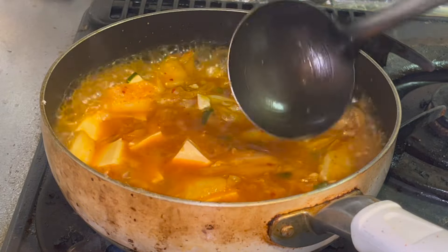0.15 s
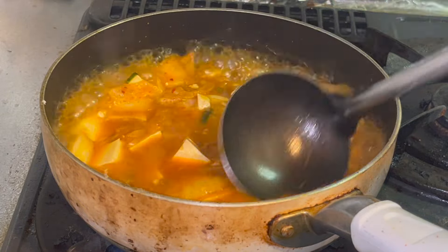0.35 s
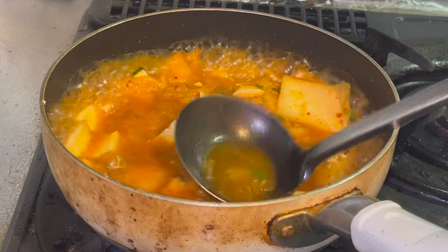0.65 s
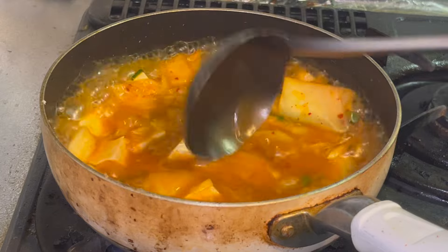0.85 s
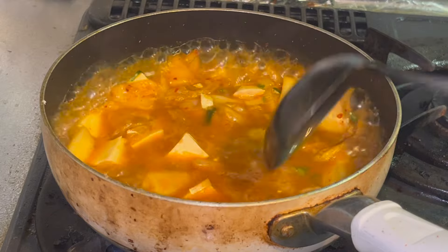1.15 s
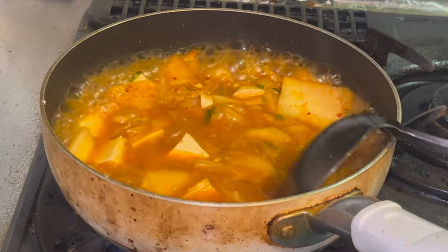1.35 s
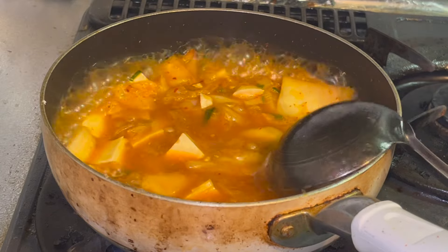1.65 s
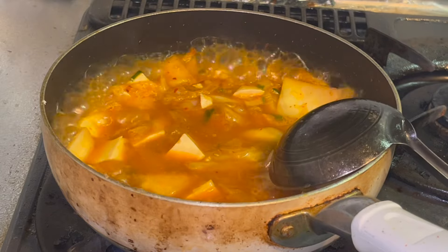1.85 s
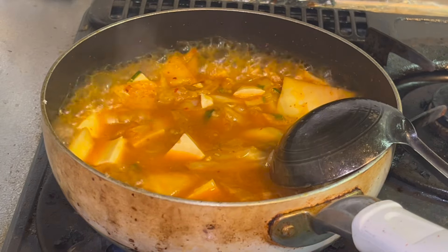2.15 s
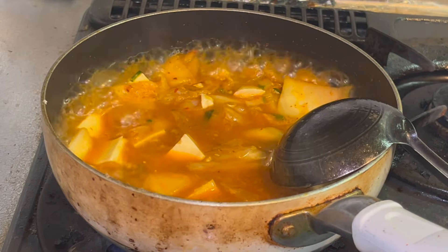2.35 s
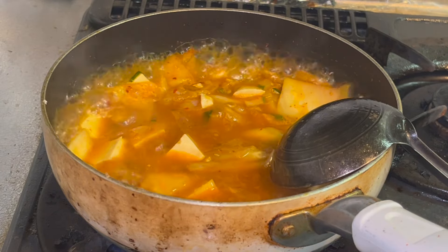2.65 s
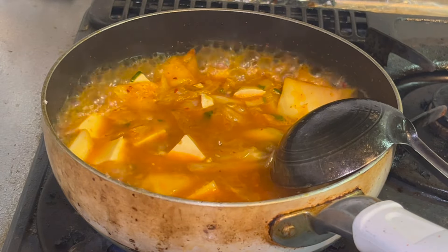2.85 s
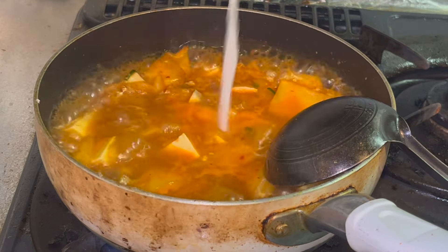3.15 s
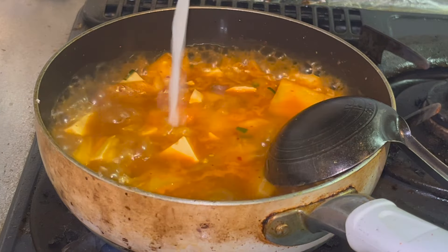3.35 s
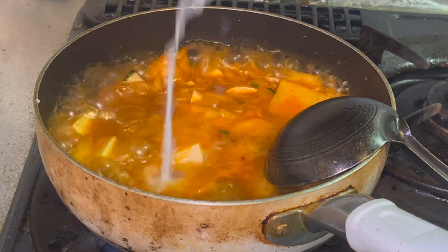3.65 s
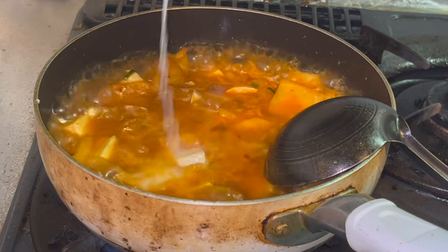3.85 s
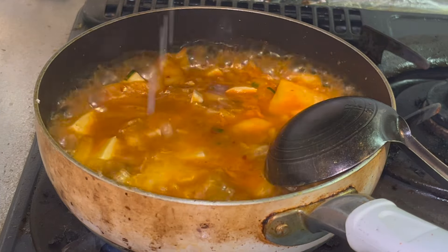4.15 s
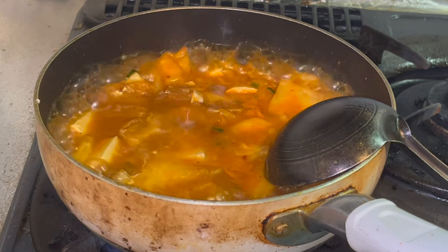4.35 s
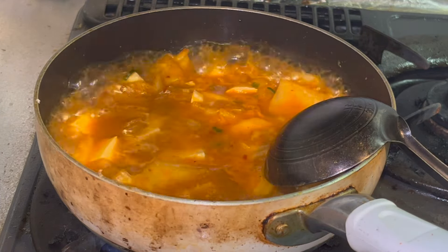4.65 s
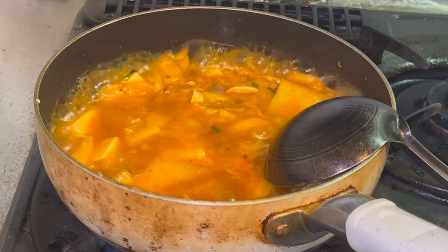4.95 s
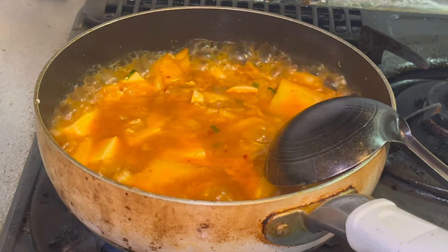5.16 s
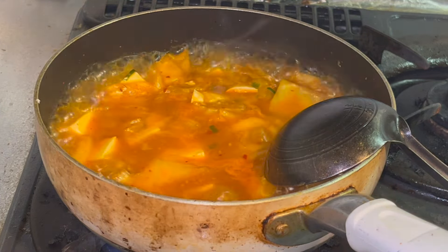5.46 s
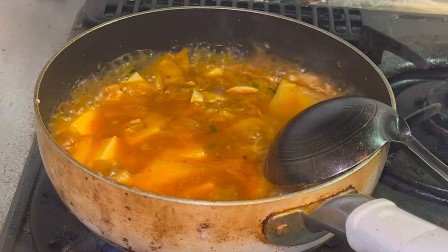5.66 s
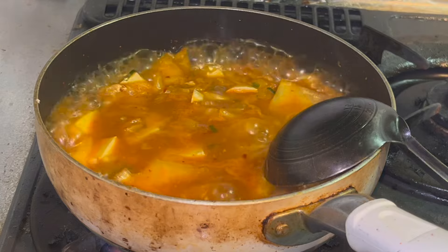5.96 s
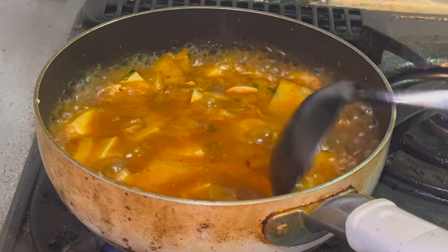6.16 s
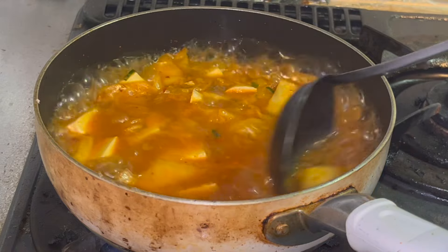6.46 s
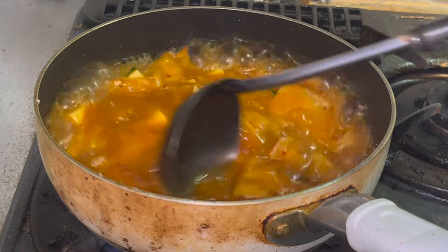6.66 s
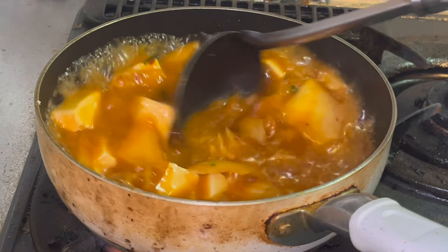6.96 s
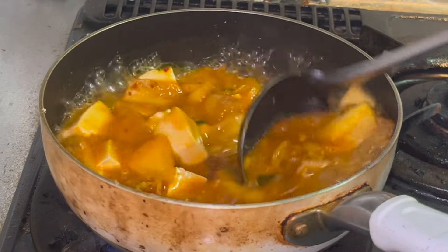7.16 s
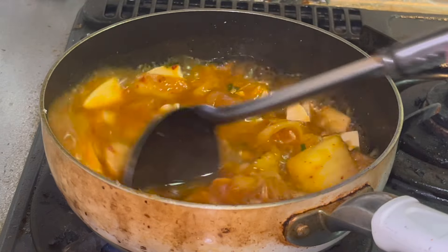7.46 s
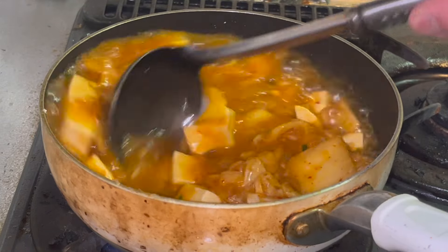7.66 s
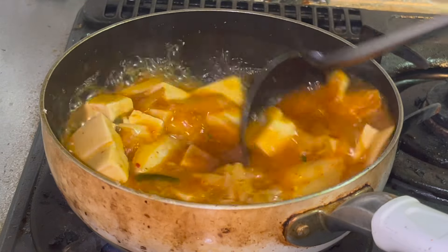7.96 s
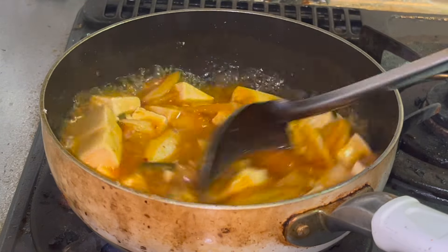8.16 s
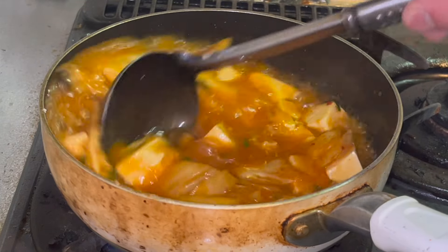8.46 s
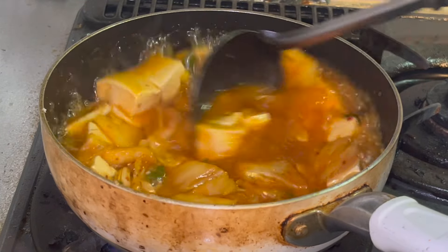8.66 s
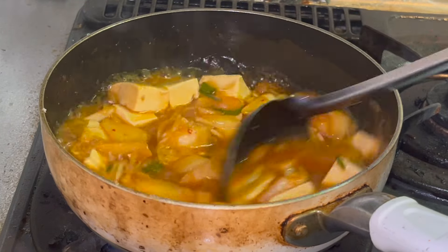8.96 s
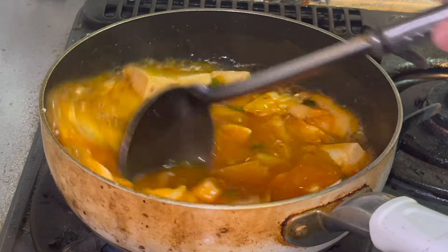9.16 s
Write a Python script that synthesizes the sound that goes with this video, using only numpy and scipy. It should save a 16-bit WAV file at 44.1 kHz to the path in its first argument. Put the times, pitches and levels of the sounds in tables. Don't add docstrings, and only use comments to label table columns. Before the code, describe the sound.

In a small home kitchen, broth simmers close to a handheld stereo microphone, with plopping bubbles over low flame rumble, hood hum and faint gas hiss. Early on a ladle drops onto the pan rim with a loud metallic clack and quick rattle. A thin stream patters in, a spoon clinks in a bowl that thuds onto the counter, and then the ladle gently stirs with light ticks.

```python
import sys
import numpy as np
from scipy import signal
from scipy.fft import rfft, irfft, next_fast_len
from scipy.io import wavfile

SR = 44100
rng = np.random.default_rng(int(sys.argv[2]) if len(sys.argv) > 2 else 0)


def amplitude_ratio(level_db):
    exponent = np.asarray(level_db, float) / 20
    return 10 ** exponent


def log_audio(samples):
    frames = np.atleast_2d(samples).T
    limited = np.clip(frames, -1, 1)
    pcm = np.round(limited * 32767).astype(np.int16)
    wavfile.write(sys.argv[1], SR, pcm)


N = 411012
PAD = next_fast_len(N + SR)
HZ = np.arange(PAD // 2 + 1) * SR / PAD

# (time [s], bubbling level [dB])
VIGOUR = [(0.0, -51.5), (0.6, -51), (1.66, -49.5), (2.2, -50.5), (3.0, -49), (3.75, -47), (4.2, -50),
          (5.3, -48), (5.65, -45.5), (6.36, -49.5), (6.6, -51), (7.3, -51), (7.74, -51), (8.05, -54),
          (9.32, -57.5)]
# (time [s], peak level [dB], pitch [Hz])
GLUGS = [(0.31, -28, 1720), (1.378, -29, 1390), (1.997, -31, 750), (2.126, -41, 696), (2.351, -27, 1820),
         (2.924, -31, 2040), (2.968, -29, 1750), (3.212, -29.5, 1770), (3.419, -29.5, 1060),
         (3.682, -33, 736), (3.347, -32.5, 555), (3.713, -38, 851), (3.827, -27.5, 1700),
         (3.921, -27, 1070), (4.145, -32, 820), (4.521, -25, 1700), (4.785, -31, 844), (4.815, -31, 1690),
         (5.21, -30, 1710), (5.227, -24, 1900), (5.261, -25, 1890), (5.805, -39, 525), (5.958, -31, 780),
         (6.17, -30, 886), (6.418, -39, 1900), (6.612, -27, 1500), (6.006, -32, 720), (6.353, -31, 1150),
         (6.463, -33, 800), (6.648, -26, 1630), (6.743, -35, 1110), (6.814, -30, 1150),
         (7.232, -26.5, 2650), (7.243, -32.5, 520), (7.275, -31, 2630), (7.407, -30, 1810),
         (7.503, -30, 530), (7.902, -28, 1780), (7.915, -30, 1750), (8.012, -29.5, 440),
         (8.329, -27.5, 1680), (8.697, -24.5, 1890), (9.224, -32, 1690)]
# (frequency [Hz], density [dB per Hz])
GURGLE = [(500, -40), (700, -6), (1000, -4.5), (1400, -3), (1900, -2.5)]
BROTH = [(240, -15.5), (300, -1), (600, -4.5), (1000, -10), (1600, -4.5), (1700, -6.5), (2100, -5.5),
         (3000, -10.5), (3500, -15.5), (5500, -18), (7000, -18)]
# (frequency [Hz], width [Hz], height over noise [dB])
PAN_HUM = [(438, 75, 10.54), (1195, 21, 3.9), (1720, 33, 10.4), (1890, 54, 7.3)]
# (time [s], peak level [dB], pitch [Hz])
DROPS = [(0.5896, -29.5, 3280), (0.6609, -39, 4790), (1.0021, -44, 3080), (1.3758, -39, 3760),
         (2.7185, -30, 3000), (3.037, -37, 3520), (3.266, -30, 7500), (3.3218, -37, 4000),
         (3.3386, -24.5, 6350), (3.3608, -36, 3560), (3.295, -40, 4000), (3.4807, -42, 3580),
         (3.5156, -36, 3900), (3.5294, -28.5, 4800), (3.7815, -46, 3870), (3.805, -42, 4210),
         (3.5444, -39, 5040), (3.682, -35, 4800), (4.5313, -38, 3000), (4.816, -36.5, 3400),
         (5.9599, -36, 3400), (6.1587, -38, 4450), (6.19, -29, 2750), (6.8467, -31, 4700),
         (6.9092, -42, 5170), (7.2818, -37, 3580), (7.4071, -35, 3420), (7.9149, -64, 3050)]
SPRAY = [(3.038, -37.5, 6800), (3.15, -39, 8000), (3.185, -42, 7400), (3.267, -35, 3830), (3.49, -38, 9050),
         (3.665, -34, 8040), (3.752, -39, 14300), (3.81, -37, 14000), (4.129, -35, 7700)]
# (time [s], peak level [dB], brightness [dB], crack level [dB], contact [s])
KNOCKS = [
    (1.6312, -3, 8.5, -11.5, 0.00076),
    (1.6345, -15, 9, -8, 0.001),
    (1.647, -12.5, 4, -22, 0.002),
    (1.663, -19, -6, -2, 0.0043),
    (1.681, -24, 0, -14, 0.004),
    (1.695, -21, 16, 4.5, 0.003),
]
# (frequency [Hz], level [dB], 60 dB decay [s])
PAN = [(248, -4, 0.08), (300, -7, 0.038), (396.6, -1.5, 0.12), (434, -6.5, 0.16), (492, -7, 0.09),
       (678, -10, 0.071), (750, -3, 0.03), (930, -0.5, 0.021), (1045, -4, 0.027), (1240, -7, 0.028),
       (1390, -5, 0.021), (1720, -2, 0.016), (1910, -5, 0.02), (2600, -19, .05), (2970, -28, 0.059),
       (3480, -25, 0.025), (3920, -39, 0.059), (4800, -35, 0.045), (5860, -16, 0.012)]
# (time [s], peak level [dB], brightness [dB], crack level [dB], contact [s])
TICKS = [(1.461, -30, 8, -7, 0.006), (4.786, -46, -3, -25, .001), (6.354, -38, -3, -30, .001),
         (6.569, -32.5, 7, -9, 0.003), (6.575, -36, 3, -11, .003), (6.59, -49, -8, -16, 0.024),
         (7.205, -49, 6, 11.5, .002), (9.063, -58, -6, 16, .003), (7.233, -54, 1, -10, .001),
         (9.162, -33.5, -1, -22, 0.0027)]
# (frequency [Hz], level [dB], 60 dB decay [s])
LADLE = [(500, -1, 0.025), (820, 2.5, 0.02), (1150, -1, 0.018), (1370, -1, 0.021), (1950, -12, 0.039),
         (2500, -16, 0.015), (3400, -37, 0.016), (3900, -28, .03), (4700, -11, 0.019), (5530, -9, 0.018)]
# (time [s], peak level [dB], brightness [dB], crack level [dB], free ringing [s])
CLINKS = [(5.112, -34.5, 35, -14, .016), (5.119, -37, 32, 3, .012), (5.137, -40.5, 25, 6, .02),
          (5.141, -34, 5, -12, .016), (5.319, -18.5, -10, -22, 0.021), (5.331, -31.5, 25, -5, 0.018),
          (5.36, -22, -12, -12, 0.015), (5.371, -16, 11, -17, 0.01), (5.384, -30, 24, -4, .01),
          (5.4, -31, 8, -13, 0.006), (5.415, -42, 34, -12, .04), (5.509, -18, -2, -15.5, 0.013),
          (5.518, -27, -5, -20, 0.011), (5.531, -31, 4, -22, .04)]
# (frequency [Hz], level [dB], 60 dB decay [s])
BOWL = [(2454, -5.5, .08), (2555, 0.5, 0.13), (2596, -2.5, 0.048), (3050, -13, 0.033), (3240, -22, 0.03),
        (5580, -7, 0.023), (5660, -13.5, 0.082), (5850, -6.5, 0.03), (6650, -16, 0.049), (7830, -23, 0.086),
        (9300, -20, 0.055), (10020, -15.5, 0.11), (11500, -27, .04), (14600, -20, .04)]
# (time [s], peak level [dB], brightness [dB], crack level [dB], contact [s])
THUDS = [
    (5.4885, -13.5, 8, -18, 0.001),
    (5.497, -31.5, 14, -20, .002),
    (5.5135, -16.5, -4, -12, 0.0033),
]
# (frequency [Hz], level [dB], 60 dB decay [s])
COUNTER = [(198, -20, 0.15), (332, -14.5, 0.066), (422, -7.5, 0.045), (563, -2, 0.058), (650, -6, 0.124),
           (708, 1.5, 0.085), (825, -2.5, 0.048), (967, 0, 0.038), (1295, 5.5, 0.015), (1690, -3, 0.019),
           (2040, 0.5, 0.01), (2430, 1.5, 0.015)]
# (time of firmest press [s], level [dB], swell [s], fade [s])
STROKES = [
    (6.61, -44, .025, 0.12),
    (7.85, -63, 0.16, 0.078),
    (8.9, -51.5, 0.41, 0.063),
]
# (frequency [Hz], density [dB per Hz])
RUB = [(380, -6), (440, 1.5), (520, -4), (950, -51), (1110, 1), (1250, -15), (1500, -11)]
# (time [s], peak level [dB], pitch [Hz])
SURGES = [(1.669, -40, 70.0), (1.992, -31.5, 70.6), (2.05, -34, 60.4), (2.598, -35, 51),
          (2.652, -31.5, 68.5), (4.298, -32.5, 89), (4.459, -37, 87.5), (4.549, -38, 95), (5.527, -30, 90)]
# (frequency [Hz], density [dB per Hz])
RUMBLE = [(30, -30), (46, -1), (150, -8.5), (165, -6), (260, -6), (290, -17), (400, -14)]
HISS = [(4500, -3.5), (6000, -12.5), (7200, -5), (8400, -10), (9500, -2.5), (10500, -3.5), (11500, -1),
        (13000, -4.5), (14500, -3), (15600, -31), (15950, -24)]
# (frequency [Hz], width [Hz], height over noise [dB])
HOOD = [(53, 16, 3), (79.3, 5.7, 7), (98, 13, 6.5), (119.9, 5.7, 11.5), (141, 4.8, 11.5)]
JET = [(11920, 190, 10.8), (10350, 96, 4.4), (14000, 100, 3)]
# (frequency [Hz], 60 dB decay [s])
KITCHEN = [(150, 0.41), (600, 0.23), (2500, 0.15), (8000, 0.1)]
# (frequency [Hz], likeness [0-1])
LIKENESS = [(100, .99), (260, .92), (500, .72), (900, .62), (1250, .35), (1550, .55), (1900, .8),
            (2400, .97), (2900, .99), (3500, 1), (4600, 1), (6000, .94), (8500, .92), (10800, 1),
            (11800, 1), (14000, .92)]
# (frequency [Hz], right leads left [turns], left minus right [dB])
PORTS = [(0, 0, 0), (490, -0.0072, -2.5), (1070, -0.15, 0.5), (1394, -0.28, -1), (1416, -0.19, -6),
         (1737, -0.92, -5), (2390, -1.04, -1.5), (3000, -1.032, 1), (3660, -1.011, 1)]
# (frequency [Hz], lead [turns])
SWING = [(5300, 0), (5700, .16), (7000, .25), (7700, .39), (8200, .485), (8800, .51), (9400, .66),
         (10600, .81), (11200, 1), (12800, 1), (13500, 1.15), (14500, 1.44), (14900, 1.5), (17000, 1.5)]


def at_hz(points):
    hz, value = np.transpose(points)
    return np.interp(np.log(HZ + 1), np.log(hz), value)


def drift(rate):
    r = np.exp(-80 * np.pi * rate / SR)
    wander = signal.lfilter([1], [1, -2 * r, r * r], rng.standard_normal(N // 40 + 2002))
    slow = wander[2000:]
    return np.interp(np.arange(N) / 40, np.arange(len(slow)), slow / slow.std())


def add(track, s, sound):
    i = round(s * SR)
    track[i:i + len(sound)] += sound[:N - i]


def steady_noise(spectrum, peaks, shared_db, own_db, shared_rate):
    low_hz, high_hz = spectrum[0][0], spectrum[-1][0]
    gain = amplitude_ratio(at_hz(spectrum)) * (HZ > low_hz) * (HZ < high_hz)
    for hz, width, db in peaks:
        gain = gain * (1 + (amplitude_ratio(db) - 1) / (1 + (2 * (HZ - hz) / width) ** 2))
    alike = np.clip(at_hz(LIKENESS), 0, 1)
    mid, side = rfft(rng.standard_normal((2, PAD)))
    pair = gain * (np.sqrt(1 + alike) * mid + np.sqrt(1 - alike) * side * [[1], [-1]])
    octave = np.log2(HZ / low_hz + 1e-9)
    together = shared_db * drift(shared_rate)
    out = 0
    for k in np.arange(0, np.log2(high_hz / low_hz) + 1):
        band = np.cos(np.pi / 2 * np.clip(octave - k, -1, 1)) ** 2
        flicker = amplitude_ratio(together + own_db * drift(17.0))
        out = out + flicker * irfft(pair * band, PAD)[:, :N]
    return out / out.std()


def bubble(hz, cycles, rise):
    turns = np.arange(int(cycles * SR / hz)) * hz / SR
    swell = 1 - np.exp(-turns / 1.54)
    return swell * amplitude_ratio(-40 * turns / cycles) * np.sin(2 * np.pi * turns * (1 + rise * turns / cycles))


def boil(per_s, low_hz, octaves, cycles):
    chance = rng.random(N)
    look = rng.random((N // 20, 2))
    born = np.flatnonzero(chance < per_s * amplitude_ratio(5.0 * drift(6.0)) / SR)
    out = np.zeros(N)
    for i, (pitch, size) in zip(born, look):
        loudness = amplitude_ratio(-3.3 * np.log(size + 0.02))
        add(out, i / SR, loudness * bubble(low_hz * 2 ** (octaves * pitch), cycles, rise=0.091))
    return out


def pops(events, cycles, rise, lift_db):
    out = np.zeros(N)
    for s, db, hz in events:
        add(out, s, amplitude_ratio(db + lift_db) * bubble(hz, cycles, rise))
    return out


def splashes(events, long_s, spread, lift_db):
    out, t = np.zeros(N), np.arange(SR // 20) / SR
    envelope = amplitude_ratio(-60 * t / long_s) * (1 - np.exp(-t / 0.002))
    for (s, db, hz), noise in zip(events, rng.standard_normal((len(events), len(t)))):
        edges = signal.butter(2, [hz / spread, hz * spread], "band", fs=SR, output="sos")
        add(out, s, amplitude_ratio(db + lift_db) * signal.sosfilt(edges, noise * envelope))
    return out


def bubbling_broth(boil_db):
    out = amplitude_ratio(boil_db + 5.5) * boil(per_s=45.0, low_hz=408.0, octaves=2.574, cycles=12.8)
    out += amplitude_ratio(boil_db + 20.0) * boil(per_s=250.0, low_hz=506, octaves=2.975, cycles=2.81)
    gurgle = steady_noise(GURGLE, [], shared_db=3.0, own_db=4.0, shared_rate=21.0)[0]
    out += amplitude_ratio(boil_db - 5.0) * gurgle
    out += pops(GLUGS, cycles=10.1, rise=0.019, lift_db=4.5)
    return out + splashes(GLUGS, long_s=0.038, spread=1.38, lift_db=-1.5)


def simmer(t, boil_db):
    warming_db = 0.2448 * (t - t.mean())
    level_db = -45.5 + warming_db + 0.1 * (boil_db - boil_db.mean())
    return amplitude_ratio(level_db) * steady_noise(BROTH, PAN_HUM, shared_db=1.0, own_db=.9, shared_rate=8.0)


def spatter():
    ringing = pops(DROPS, cycles=21.0, rise=0.022, lift_db=-8.0)
    return ringing + splashes(DROPS + SPRAY, long_s=0.02, spread=1.112, lift_db=12.5)


def pour(t):
    middle_s, half_length_s, densest_per_s = 3.2, 0.46, 210
    per_s = densest_per_s * (1 - np.abs(t - middle_s) / half_length_s)
    return amplitude_ratio(-52) * boil(per_s, low_hz=3800, octaves=.6, cycles=14.0)


def struck(blows, modes, ring_db, body_db, body_s, body_hz, crack_s, crack_hz):
    out, t = np.zeros(N), np.arange(SR // 3) / SR
    scatter = rng.normal(0, 0.23, (len(blows), len(modes)))
    grit = rng.standard_normal((len(blows), 3, len(t)))
    body_band = signal.butter(2, body_hz, "band", fs=SR, output="sos")
    crack_band = signal.butter(2, crack_hz, "band", fs=SR, output="sos")
    for blow, uneven, (rough, dense, noise) in zip(blows, scatter, grit):
        s, db, bright_db, crack_db, contact_s, *free_s = blow
        rings = 0
        for k, ((hz, mode_db, t60), u) in enumerate(zip(modes, uneven)):
            tilt_db = bright_db * np.log2(hz / modes[0][0]) / 4
            decay = amplitude_ratio(mode_db + tilt_db + u - 60 * t / t60)
            rings = rings + (-1) ** k * decay * np.sin(2 * np.pi * hz * t)
        contact = rough * np.exp(-t / contact_s)
        contact[0] += 1.75 * np.linalg.norm(contact)
        rings = signal.fftconvolve(rings, contact / np.linalg.norm(contact))[:len(t)]
        for held in free_s:
            rings = rings * amplitude_ratio(-1800 * np.maximum(t - held, 0))
        body = signal.sosfilt(body_band, amplitude_ratio(body_db - 60 * t / body_s) * dense)
        crack = signal.sosfilt(crack_band, amplitude_ratio(crack_db - 60 * t / crack_s) * noise)
        add(out, s, amplitude_ratio(db) * (amplitude_ratio(ring_db) * rings + body + crack))
    return out


def ladle_on_rim():
    return struck(KNOCKS, PAN, ring_db=-8.5, body_db=-14.5, body_s=0.21, body_hz=(600, 4500),
                  crack_s=0.044, crack_hz=(1800, 11000))


def ladle_ticks():
    return struck(TICKS, LADLE, ring_db=-4.0, body_db=7.5, body_s=0.02, body_hz=(400, 3500),
                  crack_s=0.061, crack_hz=(2000, 14000))


def spoon_on_bowl():
    contact_s = 0.0069
    blows = [(*row[:-1], contact_s, row[-1]) for row in CLINKS]
    return struck(blows, BOWL, ring_db=-4.0, body_db=-11.0, body_s=0.058, body_hz=(2400, 5500),
                  crack_s=0.12, crack_hz=(4500, 17000))


def bowl_on_counter():
    return struck(THUDS, COUNTER, ring_db=-8.0, body_db=-13.0, body_s=0.035, body_hz=(550, 4000),
                  crack_s=0.053, crack_hz=(2500, 9000))


def ladle_rub(t):
    pressure = amplitude_ratio(-60.5) * (t > 6.6)
    for s, db, swell_s, fade_s in STROKES:
        pressure = pressure + amplitude_ratio(db) * np.exp(-np.abs(t - s) / np.where(t < s, swell_s, fade_s))
    return pressure * steady_noise(RUB, [], shared_db=2.5, own_db=2.5, shared_rate=15.0)


def flame_surges():
    return pops(SURGES, cycles=3.9, rise=.01, lift_db=18.0)


def flame_and_hood():
    return amplitude_ratio(-41.5) * steady_noise(RUMBLE, HOOD, shared_db=.5, own_db=.8, shared_rate=4.0)


def gas_hiss():
    return amplitude_ratio(-53.5) * steady_noise(HISS, JET, shared_db=.45, own_db=.3, shared_rate=6.0)


def kitchen(x):
    t = np.arange(SR // 2) / SR
    tail, rest = 0, rng.standard_normal((2, len(t))) * (t > .004)
    for (hz, t60), (above, _) in zip(KITCHEN, KITCHEN[1:] + [(20000, 0)]):
        lower = signal.lfilter(*signal.butter(1, np.sqrt(hz * above), fs=SR), rest)
        tail = tail + lower * amplitude_ratio(-60 * t / t60)
        rest = rest - lower
    mid, side = rfft(tail / np.linalg.norm(tail[0]), PAD)
    unlike = np.sqrt(1.01 - np.clip(at_hz(LIKENESS), 0, 1))
    return irfft((mid + 1.6 * unlike * side * [[1], [-1]]) * rfft(x, PAD), PAD)[:, :N]


def scene():
    t = np.arange(N) / SR
    boil_db = np.interp(t, *np.transpose(VIGOUR))
    liquid = bubbling_broth(boil_db) + spatter() + flame_surges()
    blows = ladle_on_rim() + ladle_ticks() + bowl_on_counter()
    clinks = spoon_on_bowl()
    echoes = kitchen(liquid + amplitude_ratio(-1.5) * blows + amplitude_ratio(-8.0) * clinks)
    lean = amplitude_ratio(-1.5 / 2 * np.array([[1], [-1]]))
    mix = liquid + pour(t) + blows * lean + clinks + amplitude_ratio(-8.5) * echoes
    return mix + simmer(t, boil_db) + ladle_rub(t) + flame_and_hood() + gas_hiss()


def roll_off(x):
    return signal.sosfilt(signal.butter(12, 16020, fs=SR, output="sos"), x)


def record(dry):
    hz, turns, lean_db = np.transpose(PORTS)
    lean_db = np.interp(HZ, hz, lean_db) / 2
    lead_turns = np.interp(HZ, hz, turns) + np.interp(HZ, *np.transpose(SWING))
    lead = np.exp(1j * np.pi * lead_turns)
    ports = [amplitude_ratio(lean_db) / lead, amplitude_ratio(-lean_db) * lead]
    x = irfft(rfft(dry, PAD) * (HZ < 16000) * ports, PAD)[:, :N]
    return roll_off(1.51 * np.tanh(x / 1.482))


dry = scene()
out = record(dry)
log_audio(out)
```